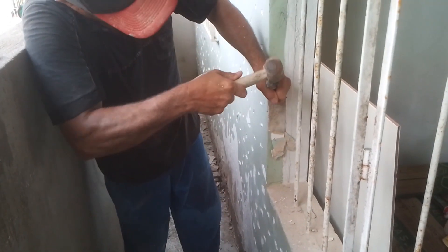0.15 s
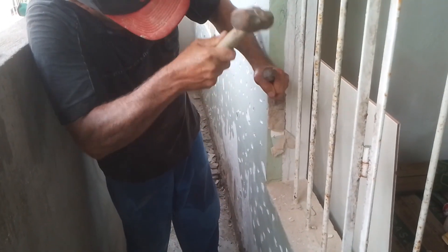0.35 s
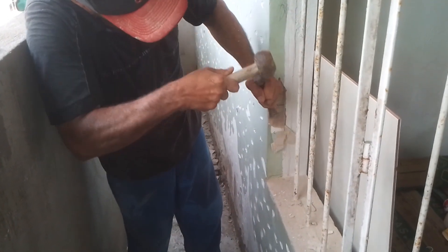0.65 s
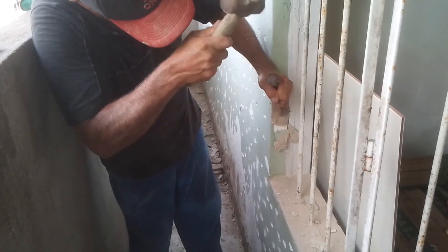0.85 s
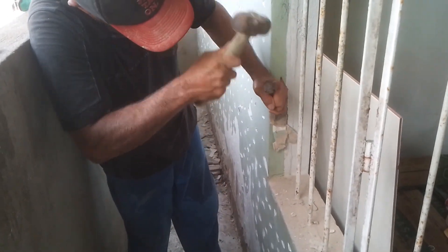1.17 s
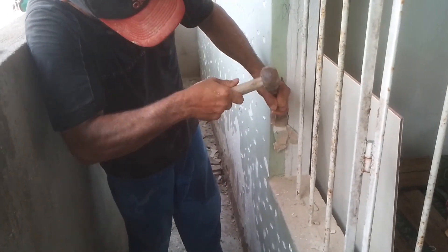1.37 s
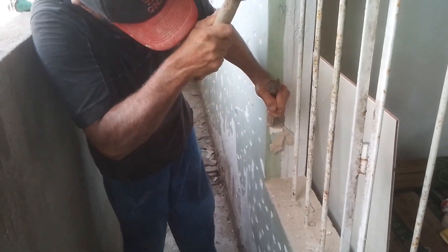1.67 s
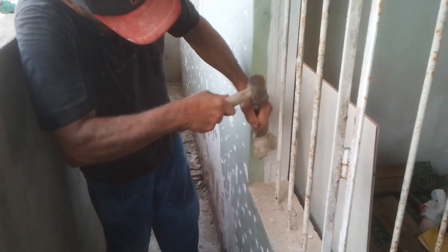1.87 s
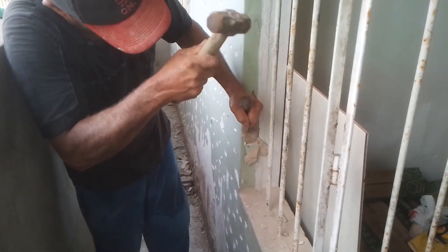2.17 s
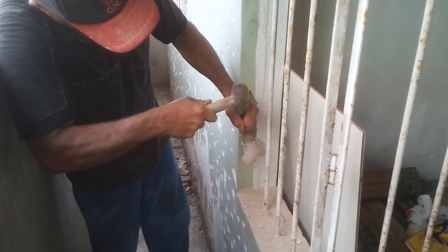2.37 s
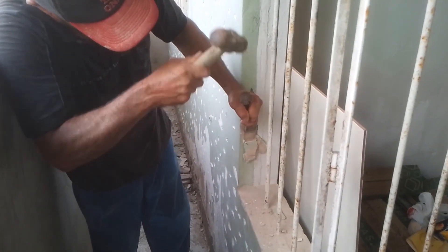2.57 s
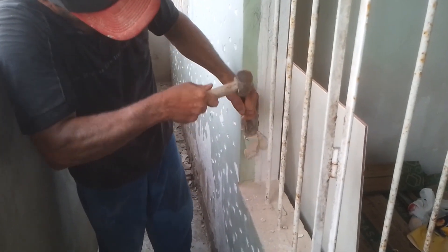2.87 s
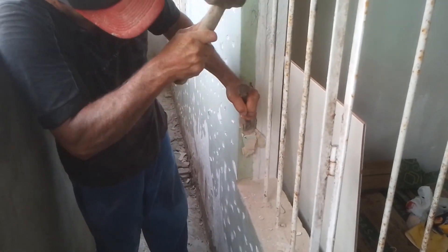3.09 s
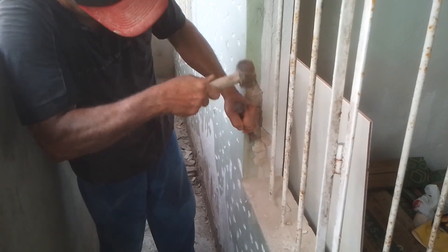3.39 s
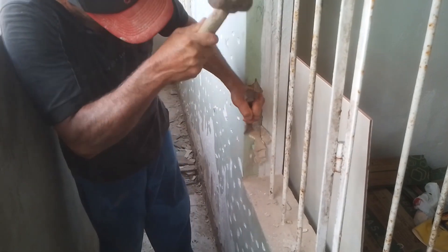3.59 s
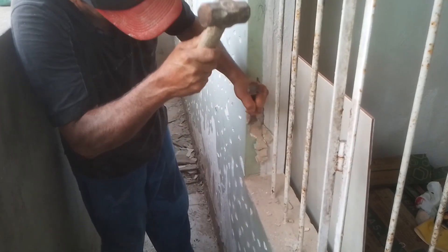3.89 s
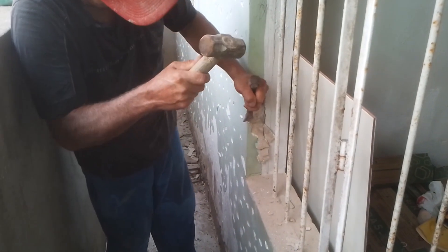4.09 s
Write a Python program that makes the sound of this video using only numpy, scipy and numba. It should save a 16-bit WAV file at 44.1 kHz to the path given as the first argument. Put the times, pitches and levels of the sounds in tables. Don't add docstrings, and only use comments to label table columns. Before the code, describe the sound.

A hammer cracks steadily on a steel chisel, each loud metallic blow thumping the wall and shaking loose bits of render that patter down.

```python
import sys
import numpy as np
from scipy import signal
from scipy.fft import rfft, irfft
from scipy.io import wavfile
from scipy.ndimage import uniform_filter1d, minimum_filter1d
from numba import njit

SR = 44100
rng = np.random.default_rng(int(sys.argv[2]) if len(sys.argv) > 2 else 0)


def wav_out(sig):
    wavfile.write(sys.argv[1], SR, np.round(np.clip(np.atleast_2d(sig).T, -1, 1) * 32767).astype(np.int16))


def decibels_to_gain(level_db):
    exponent = np.asarray(level_db, float) / 20
    return 10 ** exponent


N = 186919
SIZE = 24576

# f/Hz, spectrum level/dB
AIR_SPECTRUM = [(120, -37.5), (200, 10), (2960, -10.5), (4350, -4.5), (5040, -2), (5520, -15),
                (15100, -9.5), (16000, 4)]
AIR_DB = -77

# f/Hz, time to fall 60 dB/s
PASSAGE_DECAY = [(100, .6), (200, .42), (300, 0.5), (700, 0.43), (1840, 0.39), (4850, 0.4), (12800, 0.31)]
PASSAGE_DB, PASSAGE_RISE_S = -25.5, 0.00033
ALIKE_HZ = 534
BLOOM_CYCLES = 2.6
BOOM_HZ = [276, 296, 258]
BOOM_DB = [-29, -33, -35]
BOOM_T60_S = 0.7

EVEN, EVEN_BELOW_HZ = 0.45, 1500

# start t/s, peak level/dB, time to fall 60 dB/s
GRIT_SHOWERS = [
    (0.001, -37.5, 0.05),
    (2.17, -40, 0.1569),
    (2.628, -24, 0.0004),
    (2.683, -24, 0.62),
    (3.108, -38, .25),
    (3.561, -33, .3),
    (3.61, -35, .3),
    (3.815, -42, .3),
    (3.87, -45, .3),
    (4.141, -55, .16),
]
# f/Hz, width/Hz, boost level/dB
GRIT_RINGS = [(6700, 1500, 5), (10300, 1200, 5)]
GRIT_RISE_S = 0.006

# t/s, peak level/dB, pitch above 250 Hz/octave, left minus right level/dB
LUMPS = [
    (0.334, -13.5, 1.26, -5),
    (0.743, -11, 1.9673, 3.5),
    (0.876, -28.5, 2, 0),
    (0.966, -17, 1.43, -5.5),
    (1.189, -48, 3.5, -3),
    (1.515, -28, 2.9, -17),
    (1.539, -34, 0.9, 3),
    (3.784, -28, 1.4, -1.5),
    (4.028, -43.5, 3.274, -3),
]
# t/s, peak level/dB, pitch above 250 Hz/octave
FLAKES = [
    (1.121, -50, 3.2),
    (3.154, -46, 3),
    (3.564, -37, 3.6),
    (3.589, -43, 3.1),
    (3.785, -33, 2.05),
    (3.79, -39, 3.35),
    (4.145, -44, 4.3),
]
# t/s, peak level/dB, pitch above 250 Hz/octave
CHIPS = [(0.335, -14, 3), (0.457, -32.5, 5.9), (0.884, -37, 2.2), (0.985, -23.5, 3.8), (1.008, -37.5, 2.4),
         (1.187, -39, 4.4), (1.624, -41, 5.9), (1.833, -55, 3.9), (2.195, -56, 3.9), (2.205, -44, 5.1),
         (2.216, -48.5, 5.1), (2.246, -59, 5.1), (2.315, -44, 5.1), (2.587, -28, 5.9), (2.626, -15.5, 4.75),
         (2.644, -37, 2.3), (2.684, -19.5, 5.6), (3.019, -41, 5.9), (3.107, -39.5, 3.3),
         (3.141, -42.5, 5.8), (3.196, -48.5, 4.65), (3.518, -35, 4), (3.645, -34, 6.462), (3.7, -45, 5.1),
         (3.736, -46, 5.1), (3.827, -38, 5.1), (3.91, -44, 5.1), (4.018, -52.5, 5.1), (4.107, -48, 5.785)]
LUMP_SPREAD, FLAKE_SPREAD, CHIP_SPREAD = 3.27, 0.51, 2.7
LUMP_DIRECT_DB, FLAKE_DIRECT_DB, CHIP_DIRECT_DB = 1.5, -6, -1.5

# t/s, peak level/dB, high ring over low ring level/dB
TOUCHES = [
    (0.3338, -30.5, -4),
    (0.8744, -39.5, -2),
    (0.9867, -20, 0),
    (1.514, -25, 1),
    (1.6242, -43.5, 0.5),
    (1.6927, -44, 17),
    (2.2677, -61, 2),
    (4.0271, -36.5, 0),
]
TOUCH_SHANK_HZ, TOUCH_SHANK_DB = 4250, -6

# t/s, crack level/dB, steel ring level/dB, wall thump level/dB, thump pitch above 250 Hz/octave
BLOWS = [
    (0.1036, -9, -6.5, -4.5, 2.4),
    (0.519, -13.5, 1.6, 2, 2.5),
    (1.2529, -12, -0.5, 0.7, 1.66),
    (1.8712, -12, 2.5, -4, 2.43),
    (2.3434, -10.5, -0.16, -0.8, 2.62),
    (2.762, -11, 5, -0.3, 2.24),
    (3.22, -11, 3.5, -8, 2.4),
]
# f/Hz, level/dB
FREE_RING = [
    (4560, 5),
    (4242, 10),
    (4433, 10),
    (4400, -4),
    (4300, 2),
    (4400, -4),
    (4300, 3),
]
FREE_RING_WIDTH_HZ = 35
# f/Hz, width/Hz, level/dB
STEEL = [(7830, 56, -12), (8000, 110, -22.5), (10190, 750, -15.5), (10660, 46, -1), (11350, 140, 9),
         (10510, 120, -1.5), (13500, 300, 2), (14550, 130, 8), (15300, 120, 0)]
# f/Hz, width/Hz, level/dB
SHANK = [(1510, 27, -9), (3190, 240, 4), (4220, 80, -0.5), (4457, 75, 3.5), (5230, 77, -13.5)]
# f/Hz, width/Hz, level/dB
WALL = [(326.59, 82, 10.5), (387, 46, 14), (663.4, 170, -3.5)]
CRACK_TOP_HZ = 12100

# f/Hz, width/Hz, boost level/dB
PORTS = [(7710, 870, 12.5), (10670, 1700, 9.5)]
SHELF_HZ, SHELF_DB = 12150, -5.5
LOW_CUT_HZ, TOP_CUT_HZ = 204.6, 15900
LIMIT_DB, RATIO, RELEASE_S = -2, 8, 0.0037
WARP_DB, WARP_TOP_HZ, WARP_POWER = -28, 153, 0.8
# lower f/Hz, bins a band, frames averaged, share of all power level/dB
STARVE = [(12000, 8, 2, -30), (2700, 3, 4, -31.5)]
STARVE_ABOVE_DB = -43


def peak(f, hz, width):
    return 1 / (1 + 1j * (f ** 2 - hz ** 2) / (np.maximum(f, 1) * max(width, 1)))


def body(f, modes):
    return sum((-1) ** k * decibels_to_gain(db) * peak(f, hz, width) for k, (hz, width, db) in enumerate(modes))


def burst(response, length_s):
    contact = rng.standard_normal(SIZE) * np.exp(-np.arange(SIZE) / (length_s * SR))
    push = rfft(contact)
    f = np.fft.rfftfreq(SIZE, 1 / SR)
    even = EVEN + (1 - EVEN) / (1 + (f / EVEN_BELOW_HZ) ** 4)
    size = np.abs(push)
    colour = (size / size.mean()) ** (1 - even)
    sound = irfft(push / size * colour * response)[:SIZE // 3]
    return sound / np.sqrt(np.sum(sound ** 2))


def add(out, s, sound):
    i = int(s * SR)
    sound = sound[:, :N - i]
    out[:, i:i + sound.shape[1]] += sound


def passage(dry, pan_db=0, direct_db=0):
    t, f = np.arange(SIZE) / SR, np.fft.rfftfreq(SIZE, 1 / SR)
    mid, side = rfft(rng.standard_normal((2, SIZE)))
    apart = f / np.hypot(f, ALIKE_HZ)
    noise = (mid + apart * side * np.array([[1], [-1]])) / np.hypot(1, apart)
    hz, t60 = np.transpose(PASSAGE_DECAY)
    tail = 0
    for k in range(len(hz)):
        share = np.interp(np.log(f + 1), np.log(hz), np.arange(len(hz)) == k)
        bloom = 1 - np.exp(-t * hz[k] / BLOOM_CYCLES)
        tail = tail + irfft(noise * share) * decibels_to_gain(-60 * t / t60[k]) * bloom
    standing = decibels_to_gain(np.array(BOOM_DB)) @ np.sin(2 * np.pi * np.outer(BOOM_HZ, t))
    tail = tail + decibels_to_gain(-60 * t / BOOM_T60_S) * standing
    tail = decibels_to_gain(PASSAGE_DB) * tail * (1 - np.exp(-t / PASSAGE_RISE_S))
    tail[:, 0] = decibels_to_gain(direct_db + np.array([pan_db, -pan_db]) / 2)
    return signal.fftconvolve(dry[None], tail, axes=1)


def air():
    f = np.fft.rfftfreq(N, 1 / SR)
    hz, db = np.transpose(AIR_SPECTRUM)
    shape = decibels_to_gain(np.interp(np.log(f + 1), np.log(hz), db))
    hiss = irfft(rfft(rng.standard_normal((2, N))) * shape, N)
    return decibels_to_gain(AIR_DB + 10.5) * hiss / hiss.std()


def grit():
    t, level = np.arange(N) / SR, np.zeros(N)
    for s, db, t60 in GRIT_SHOWERS:
        since = np.maximum(t - s, 0)
        level += decibels_to_gain(db - 60 * since / t60) * np.minimum(since / GRIT_RISE_S, 1)
    chance, f = rng.random((3, N)), np.fft.rfftfreq(N, 1 / SR)
    falls = chance[0] < 700 / SR
    size = decibels_to_gain(-3.4 * np.log(1 - chance[2]))
    grains = falls * np.sign(chance[1] - 0.5) * size
    rings = 1 + sum((decibels_to_gain(db) - 1) * peak(f, hz, width) for hz, width, db in GRIT_RINGS)
    grains = irfft(rfft(grains) * rings * peak(f, 9500, 15000) ** 2, N)
    return decibels_to_gain(-17.5) * level * grains / grains.std()


def debris(out, f):
    kinds = [(LUMPS, LUMP_SPREAD, LUMP_DIRECT_DB),
             (FLAKES, FLAKE_SPREAD, FLAKE_DIRECT_DB),
             (CHIPS, CHIP_SPREAD, CHIP_DIRECT_DB)]
    for pieces, spread, direct_db in kinds:
        for s, db, octaves, *pan_db in pieces:
            hz = min(250 * 2 ** octaves, 15000)
            response = peak(f, hz, hz * max(spread, 0.2)) ** 2
            click = decibels_to_gain(db + 7.0) * burst(response, 0.0012 + 1.0 / hz)
            add(out, s, passage(click, *pan_db, direct_db=direct_db))


def touches(out, f):
    for s, db, tilt_db in TOUCHES:
        shank, low, high = levels = decibels_to_gain(np.array([TOUCH_SHANK_DB, -tilt_db / 2, tilt_db / 2]))
        rings = shank * peak(f, TOUCH_SHANK_HZ, 60) + low * peak(f, 7520, 130) + high * peak(f, 11400, 190)
        gain = decibels_to_gain(db) * np.linalg.norm(levels)
        add(out, s, passage(gain * burst(rings, 0.002)))


def hammer(out, f):
    for (s, crack_db, ring_db, thump_db, octaves), (free_hz, free_db) in zip(BLOWS, FREE_RING):
        detune = f * (1 + 0.002 * rng.standard_normal())
        thump_hz = 250 * 2 ** octaves
        bends = [(hz, width, db + 1.5 * rng.standard_normal()) for hz, width, db in SHANK]
        crack = peak(f, 4980, 16000) / np.hypot(1, (f / CRACK_TOP_HZ) ** 5)
        parts = [(28, crack),
                 (24.5 + ring_db, body(detune, STEEL)),
                 (20.5, body(detune, bends)),
                 (8.5 + free_db, peak(f, free_hz, FREE_RING_WIDTH_HZ)),
                 (15.0 + thump_db, peak(f, thump_hz, 0.9 * thump_hz)),
                 (9.0 + thump_db, body(f, WALL))]
        response = sum(decibels_to_gain(db) * part / np.linalg.norm(part) for db, part in parts)
        gain = decibels_to_gain(crack_db) * np.linalg.norm(response)
        add(out, s, passage(gain * burst(response, 0.0022)))


def scene():
    out, f = air(), np.fft.rfftfreq(SIZE, 1 / SR)
    out += passage(grit())[:, :N]
    debris(out, f)
    touches(out, f)
    hammer(out, f)
    return out


@njit
def squeeze(size, top, ratio, release):
    gain, e = np.ones(len(size)), 0.
    for i in range(len(size)):
        e = size[i] if size[i] > e else e + (size[i] - e) * release
        if e > top:
            gain[i] = (top / e) ** (1 - 1 / ratio)
    return gain


def starve(x):
    f, _, z = signal.stft(x, SR, nperseg=1024)
    power = np.sum(np.abs(z[:, :504]) ** 2, axis=0)
    total = power.sum(axis=0) + 1e-18
    for hz, bins, frames, db in STARVE:
        share = power.reshape(-1, bins, len(total)).sum(axis=1) / total
        weak = uniform_filter1d(share, size=frames, axis=1) < decibels_to_gain(2 * db)
        weak &= total > decibels_to_gain(2 * STARVE_ABOVE_DB)
        top = np.inf if hz > 7000 else 6500
        in_range = (f[:504] > hz) & (f[:504] < top)
        z[:, :504] *= 1 - np.repeat(weak, bins, axis=0) * in_range[:, None]
    return signal.istft(z, SR, nperseg=1024)[1][:, :N]


def top_cut(x):
    return signal.sosfilt(signal.butter(12, 16650, fs=SR, output="sos"), x)


def record(dry):
    f = np.fft.rfftfreq(N, 1 / SR)
    ports = np.array([1 + (decibels_to_gain(db) - 1) * peak(f, hz, width) for hz, width, db in PORTS])
    shelf = decibels_to_gain(SHELF_DB / (1 + (SHELF_HZ / (f + 1)) ** 20))
    top = 1 / np.sqrt(1 + (f / TOP_CUT_HZ) ** 600)
    x = irfft(rfft(dry) * ports * shelf * top, N)
    x = signal.sosfilt(signal.butter(10, LOW_CUT_HZ, "high", fs=SR, output="sos"), x)
    gain = squeeze(np.abs(x).max(axis=0), decibels_to_gain(LIMIT_DB), 1. * RATIO, 1 / (RELEASE_S * SR))
    x = x * uniform_filter1d(minimum_filter1d(gain, size=88), size=44)
    rumble_band = signal.butter(2, [55, WARP_TOP_HZ], "band", fs=SR, output="sos")
    rumble = signal.sosfilt(rumble_band, np.abs(x) ** WARP_POWER)
    hum_band = signal.butter(2, 120, fs=SR, output="sos")
    hum = decibels_to_gain(-73.5) * signal.sosfilt(hum_band, rng.standard_normal((2, N)))
    mix = np.clip(starve(x + decibels_to_gain(WARP_DB) * rumble + hum), -1, 1)
    return top_cut(mix)


dry = scene()
out = record(dry)
wav_out(out)
```